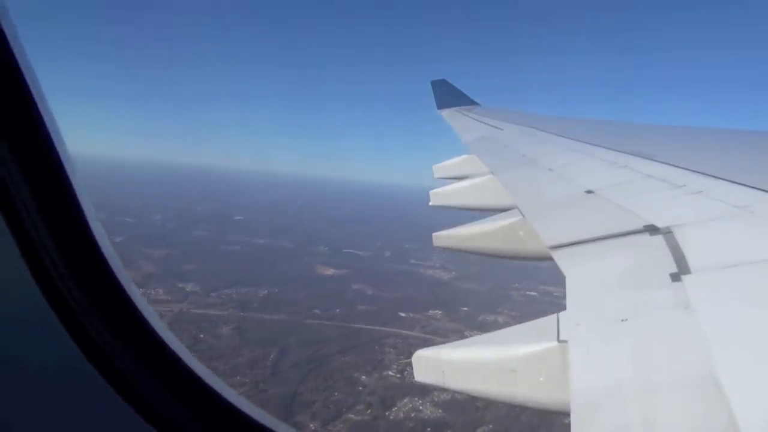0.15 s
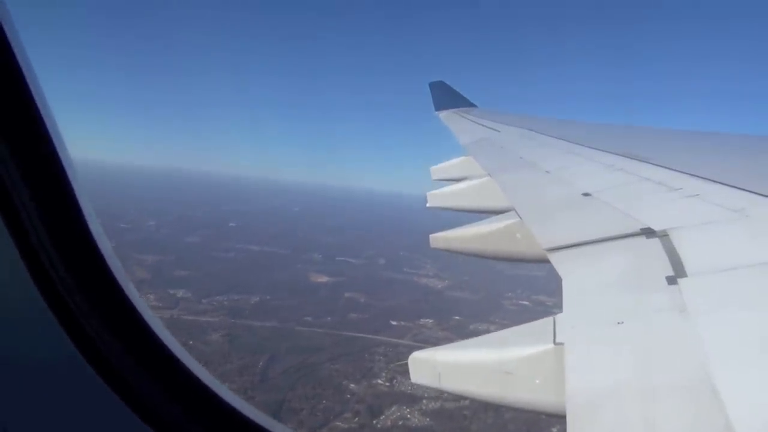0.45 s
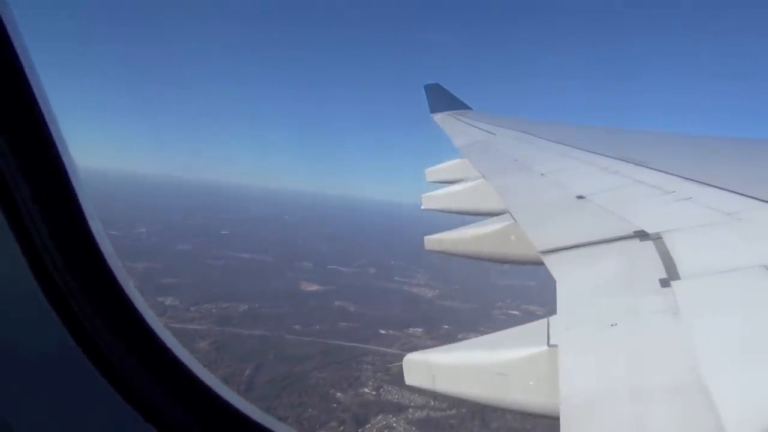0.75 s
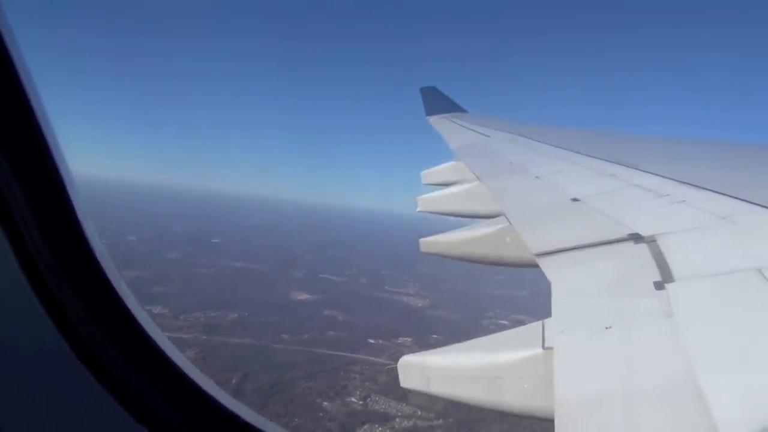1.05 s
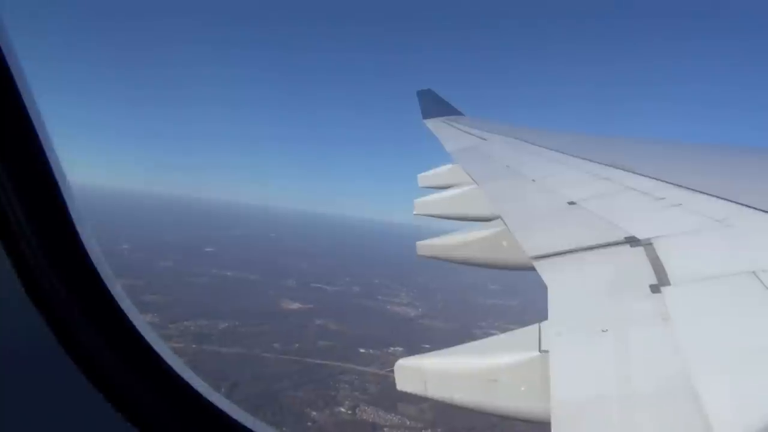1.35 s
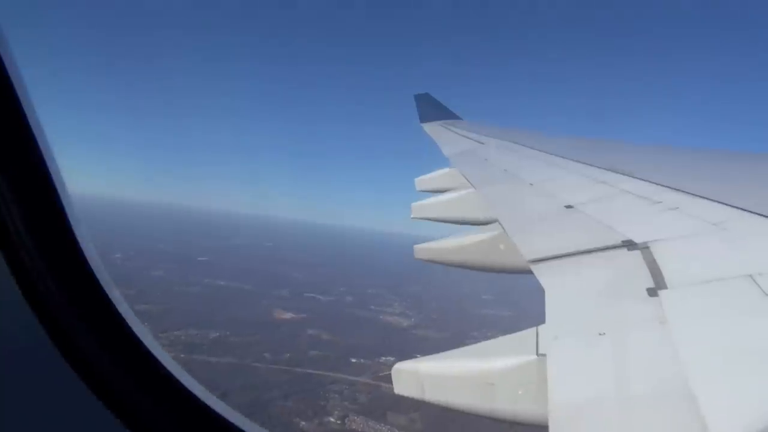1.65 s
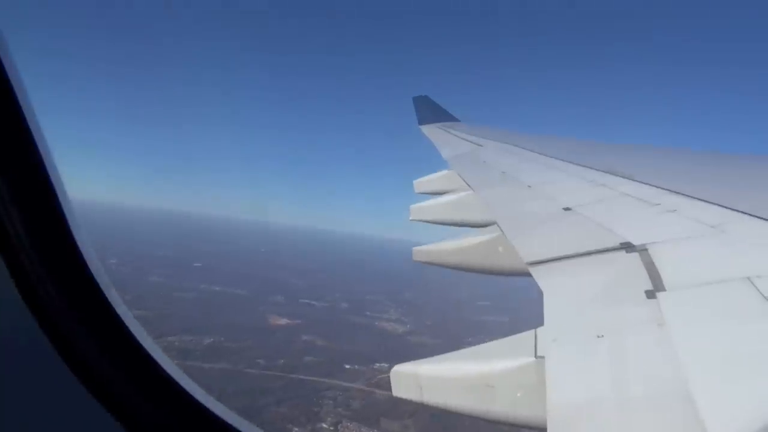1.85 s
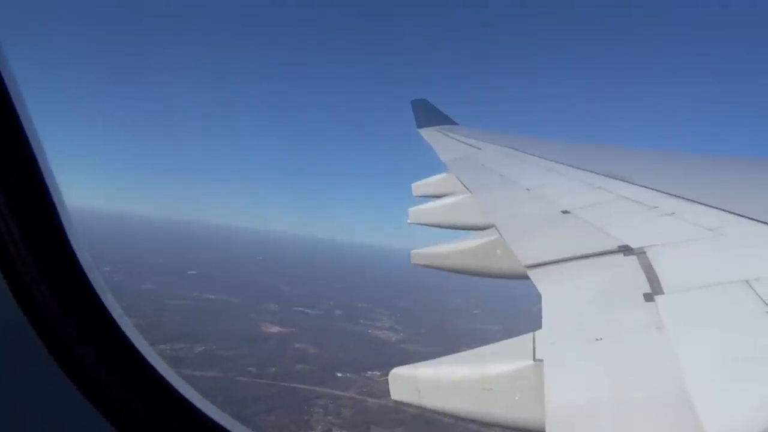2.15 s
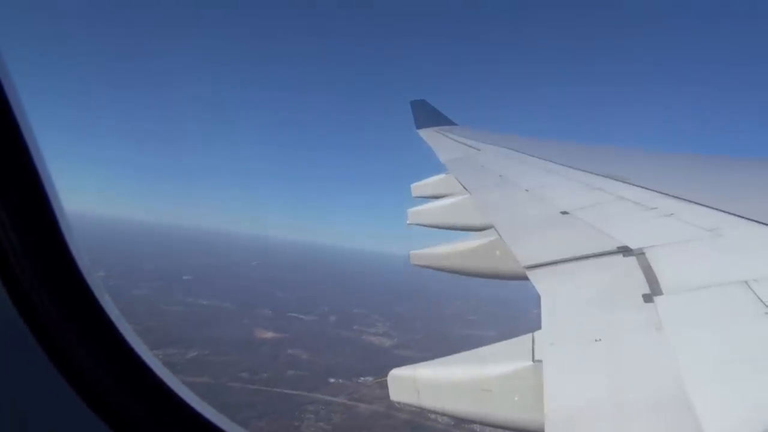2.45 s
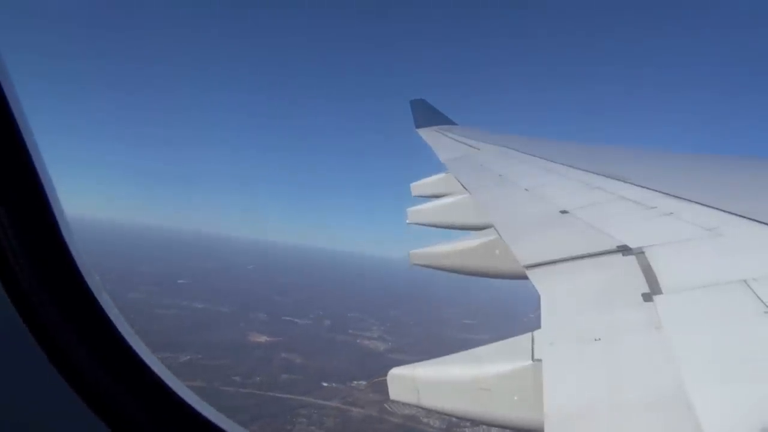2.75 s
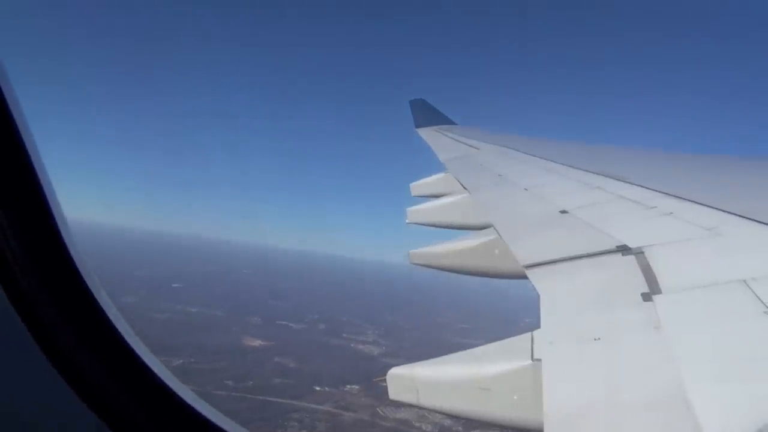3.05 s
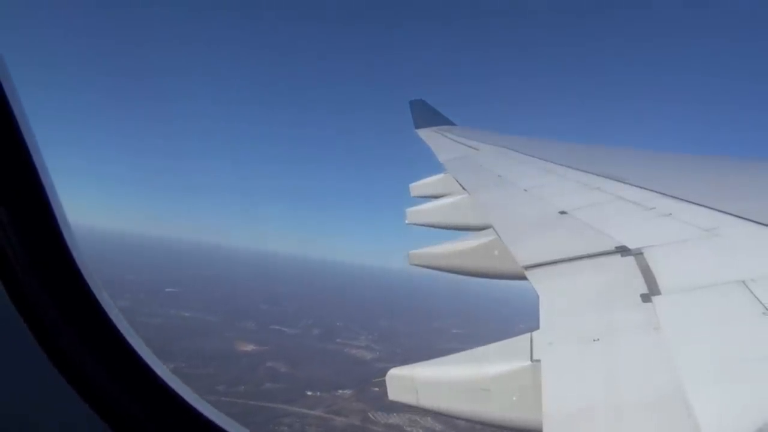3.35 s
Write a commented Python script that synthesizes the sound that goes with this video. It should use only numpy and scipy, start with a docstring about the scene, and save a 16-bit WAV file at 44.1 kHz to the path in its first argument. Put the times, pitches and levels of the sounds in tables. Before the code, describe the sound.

Deep jet engine roar fills an airliner cabin for about 3.5 seconds, already running and cut off still running. Its boomy low rumble swells and eases irregularly several times a second. Softer rushing air hisses steadily, dipping for an instant near 3.2. A low drone strengthens from about 1.9. A thin whine and tiny trim squeaks and rustles are almost buried. Wide stereo, loud and dense.

```python
"""Airliner cabin in cruise

At a window seat behind the wing, engine roar booms through the fuselage: shaped noise with two swelling bands.
Rushing air hisses over it as shaped noise with turbulent patches, and once, late on, dips briefly.
A low drone swells and a fan whines thinly, both wavering sines; the cabin trim squeaks (unsteady tones)
and rustles (bursts of high noise) faintly. A limiter ducks the peaks of the sum."""
import sys
import numpy as np
from scipy import signal
from scipy.fft import rfft, irfft
from scipy.io import wavfile
from scipy.ndimage import uniform_filter1d

SR = 44100
rng = np.random.default_rng(int(sys.argv[2]) if len(sys.argv) > 2 else 0)


def pcm_store(signal):
    """Save signal as 16-bit PCM."""
    levels = np.round(np.clip(np.atleast_2d(signal), -1, 1) * 32767)
    wavfile.write(sys.argv[1], SR, levels.astype(np.int16).T)


N = 154350  # samples, 3.5 s

# Faint tones of rubbing trim: start_s, length_s, pitch_hz, level_db
SQUEAKS = [(1.003, .11, 4996, -59), (1.68, 0.096, 9582, -72), (2.356, .23, 2610, -52),
           (2.59, .18, 2575, -55)]
# Soft brushes of high noise: start_s, length_s, centre_hz, level_db
RUSTLES = [(0.449, .06, 8500, -63), (1.01, .09, 6000, -58), (1.688, .1, 10500, -66),
           (2.91, .07, 11500, -67)]
RUSTLE_OCTAVES = 0.4

# Swell of the shaft drone: time_s, level_db
DRONE_LEVEL = [(0, -38), (.6, -34), (.9, -29), (1.5, -27.5), (1.72, -34), (1.95, -24), (2.7, -24.5),
               (3.2, -25), (3.5, -30)]
DRONE_HZ, WHINE_HZ, WHINE_DB = 52.66, 1371, -49.5

# Coherence between the two microphones: frequency_hz, likeness (1 = identical)
COHERENCE = [(25, .98), (50, .998), (130, .995), (190, .98), (230, .93), (330, .93), (400, .79), (500, .66),
             (600, .65), (800, .28), (1000, .42), (1200, .22), (1500, .52), (1850, .28), (2600, .63),
             (3400, .55), (4500, .79), (6300, .8), (9200, .55), (12000, .9)]
# Phase by which left leads right: frequency_hz, lead_rad
PHASE_LEAD = [(25, .15), (95, .37), (195, .46), (250, .14), (450, 0), (620, .8), (800, 1.65), (1150, 1.2),
              (1600, .8), (2050, -.3), (2900, .15), (4000, -.08), (7000, .08), (14000, 0)]
# Level of left minus right: frequency_hz, difference_db
LEFT_TILT = [(30, -.5), (180, -.9), (270, 0), (340, 1.8), (700, 1.3), (1030, -.8), (1300, .5), (1550, -.3),
             (2000, 1.3), (4500, 1.6), (7000, .7), (12000, 0)]

# Relative spectral density of the rushing air: frequency_hz, density_db (per Hz)
AIR_SPECTRUM = [(100, -19.5), (500, 5.5), (900, 14), (1150, 11), (1300, 3), (1410, 8.5), (1480, 13),
                (1580, 6.5), (2000, 3), (2600, 0.5), (3400, -2.5), (3900, -3.5), (4120, -1), (4300, -4),
                (4480, 0.1), (4850, -6.5), (5300, -6.5), (5680, -5.5), (6100, -9), (7300, -11.5),
                (8000, -16), (9500, -18.5), (10900, -22.5), (11450, -19.5), (12500, -24.5), (13500, -27),
                (15000, -35.5)]
# Gain of the hiss: time_s, gain_db
HISS_GAIN = [(0, 1), (.2, 0), (.48, 0.3), (.63, 0.8), (.85, -0.5), (1.06, 0.9), (1.17, -.7), (1.48, 1.1),
             (1.85, 0.4), (2.3, 0.5), (2.42, 0.5), (2.72, .5), (2.88, 0), (3.225, -0.5), (3.245, -6.5),
             (3.265, -0.5), (3.5, -1)]
AIR_DB, PATCH_DB, FLUTTER_DB = -37.5, 0.45, 0.17  # base level; rms depths of patches and flutter

# Relative spectral density of the engine roar: frequency_hz, density_db (per Hz)
ROAR_SPECTRUM = [(15, -38.5), (25, -25.5), (36, -14.5), (48, -23.5), (64, -10), (78, -12.5), (100, -6),
                 (118, -2.5), (131, 1.9), (143, -2), (157, -1.5), (172, -6.5), (192, -5.5), (210, -9),
                 (232, -6), (268, -7), (294, -11), (332, -9.5), (350, -15), (420, -19), (520, -26),
                 (600, -24.5), (800, -29.5), (1100, -37), (1600, -48.5), (3000, -81)]
# Gain at the centre of the boom band: time_s, gain_db
BOOM_GAIN = [(0, -2.5), (.2, 3), (.42, -3.5), (.6, 2.5), (.88, -3.5), (1.08, 2.5), (1.2, 1.5), (1.5, -3.5),
             (1.72, 1.5), (1.95, -3), (2.15, 1), (2.5, 2), (2.8, -3), (3.05, 1), (3.3, -0.5), (3.5, -6.5)]
# Gain at the centre of the upper roar band: time_s, gain_db
BODY_GAIN = [(0, 0), (.4, -1.5), (.75, 1), (1.2, -2), (1.5, -2), (1.62, 6), (1.78, 0.5), (2.1, 0.5),
             (2.72, 0), (2.87, 3), (3.05, -1), (3.5, 1)]
ROAR_DB = -10.5  # before the two bands swell
BOOM_HZ, BOOM_OCTAVES = 143, 0.4
BODY_HZ, BODY_OCTAVES = 276, 0.2

CEILING_DB, RELEASE_DB_PER_S, ATTACK_S = -2.5, 47, 0.002
EDGE_HZ = 14700  # upper band limit


def amp(db):
    """Level: a gain is ten to the power of decibels over twenty."""
    return 10 ** (np.asarray(db) / 20)


def unit(x):
    """Normalization: dividing by the root mean square gives rms 1."""
    return x / np.sqrt(np.mean(x ** 2) + 1e-20)


def at_hz(points, hz):
    """Interpolation of a spectrum along a logarithmic frequency axis."""
    f, value = np.transpose(points)
    return np.interp(np.log(hz + 1), np.log(f + 1), value)


def at_time(points, t):
    """Linear interpolation of a control curve in time."""
    return np.interp(t, *np.transpose(points))


def add(mix, start, sound):
    """Superposition: pressures add from the start time (s) onward."""
    part = mix[max(round(start * SR), 0):][:len(sound)]
    part += sound[:len(part)]


def wander(rate):
    """Low-pass noise: a Gaussian roll-off at rate (Hz) leaves slow random motion of rms 1."""
    f = np.fft.rfftfreq(N, 1 / SR)
    low_pass = np.exp(-(f / rate) ** 2) * (f > 0)  # no constant offset
    return unit(irfft(rfft(rng.standard_normal(N)) * low_pass, N))


def band(x, hz, octaves):
    """Band-pass filtering: a Gaussian bell in log frequency, without phase shift."""
    f = np.fft.rfftfreq(N, 1 / SR)
    bell = np.exp(-.5 * (np.log2((f + 1) / hz) / octaves) ** 2)
    return irfft(rfft(x) * bell, N)


def cabin_noise(spectrum):
    """Partial coherence: random-phase noise in a diffuse field, as two microphones pick it up."""
    hz = np.fft.rfftfreq(N, 1 / SR)
    a, b = np.exp(2j * np.pi * rng.random((2, len(hz))))
    coherence = np.clip(at_hz(COHERENCE, hz), -.999, .999)
    mid = a * np.sqrt(1 + coherence)
    side = b * np.sqrt(1 - coherence)
    # each channel takes half of the level and phase difference
    lean = amp(at_hz(LEFT_TILT, hz) / 2) * np.exp(.5j * at_hz(PHASE_LEAD, hz))
    channels = np.array([(mid + side) * lean, (mid - side) / lean])
    return unit(irfft(channels * amp(at_hz(spectrum, hz)), N))


def rustle(length, hz, db):
    """Band-limited noise: a brief soft brush under a smooth rise and fall."""
    count = int(length * SR)
    brush = band(rng.standard_normal(N), hz, RUSTLE_OCTAVES)[:count]
    return amp(db) * unit(brush * np.hanning(count))


def squeak(length, hz, db):
    """Frictional vibration: rubbing trim panels give a tone unsteady in pitch and strength."""
    count = int(length * SR)
    pitch_hz = hz * (1 + .006 * wander(rate=16)[:count])
    phase = 2 * np.pi * np.cumsum(pitch_hz) / SR
    grip = 1 + .25 * wander(rate=35)[:count]
    fade = signal.windows.tukey(count, .5)
    return amp(db) * unit(np.sin(phase) * grip * fade)


def tone(hz, waver_hz, rate, lead=0):
    """Frequency modulation: a wavering sine on both channels, left leading by lead (rad)."""
    phase = 2 * np.pi * np.cumsum(hz + waver_hz * wander(rate)) / SR
    return unit(np.sin([phase + lead, phase]))


def machines(t):
    """Rotational tones: the low drone of engine shafts, and a thin fan whine a little to the left."""
    drone = tone(DRONE_HZ, waver_hz=1.12, rate=3, lead=0.25) * amp(at_time(DRONE_LEVEL, t))
    whine = tone(WHINE_HZ, waver_hz=1.7, rate=8, lead=.8)
    whine_level = amp(WHINE_DB + 0.79 * wander(rate=6))
    left_right_gain = amp([[2], [-2]])
    return drone + whine * whine_level * left_right_gain


def air(t):
    """Turbulent flow noise: small patches in time and frequency swell at random, with slight flutter."""
    window = dict(nperseg=512, noverlap=384)
    z = signal.stft(cabin_noise(AIR_SPECTRUM), **window)[2]
    patches = rng.standard_normal(z.shape[1:])  # shared by both channels
    patches = uniform_filter1d(patches, size=9, axis=0)  # smooth over frequency
    patches = unit(uniform_filter1d(patches, size=22, axis=1))  # smooth over time
    hiss = signal.istft(z * amp(PATCH_DB * patches), **window)[1][:, :N]
    return hiss * amp(AIR_DB + at_time(HISS_GAIN, t) + FLUTTER_DB * wander(rate=20))


def roar(t):
    """Resonant transmission: exhaust roar through the fuselage, two bands of it swelling and easing."""
    noise = cabin_noise(ROAR_SPECTRUM)
    # gain minus one: the band is already present once in the noise
    boom = band(noise, BOOM_HZ, BOOM_OCTAVES) * (amp(at_time(BOOM_GAIN, t)) - 1)
    body = band(noise, BODY_HZ, BODY_OCTAVES) * (amp(at_time(BODY_GAIN, t)) - 1)
    return amp(ROAR_DB) * (noise + boom + body)


def scene():
    """Superposition of faint cabin sounds, machine tones, air and roar."""
    t = np.arange(N) / SR
    small = np.zeros(N)  # the same in both channels
    for start, length, hz, db in RUSTLES:
        add(small, start, rustle(length, hz, db))
    for start, length, hz, db in SQUEAKS:
        add(small, start, squeak(length, hz, db))
    return small + machines(t) + air(t) + roar(t)


def record(dry):
    """Peak limiting: gain drops quickly and recovers slowly; then a low-pass sets the band limit."""
    peak_db = 20 * np.log10(abs(dry).max(0) + 1e-9)
    over_db = np.maximum(peak_db - CEILING_DB, 0)
    # a running maximum on a rising ramp holds each peak and releases it at a steady rate
    ramp = np.arange(N) / SR * RELEASE_DB_PER_S
    held_db = np.maximum.accumulate(over_db + ramp) - ramp
    limited = dry * amp(-uniform_filter1d(held_db, int(ATTACK_S * SR)))
    soft_ends = signal.windows.tukey(N, .002)
    low_pass = signal.firwin(401, EDGE_HZ, window=("kaiser", 9), fs=SR)
    return signal.oaconvolve(limited * soft_ends, low_pass[None], "same", axes=1)


dry = scene()
out = record(dry)
pcm_store(out)
```